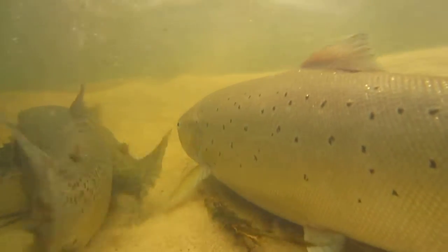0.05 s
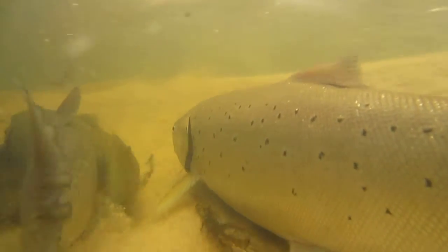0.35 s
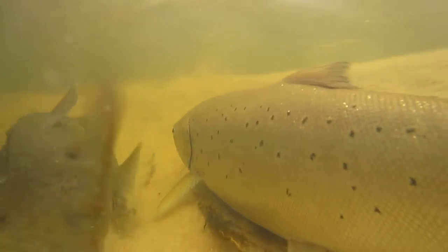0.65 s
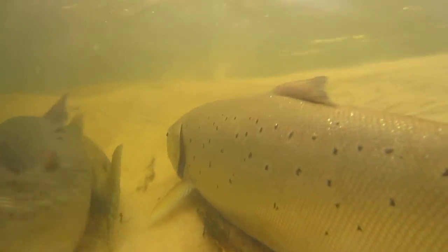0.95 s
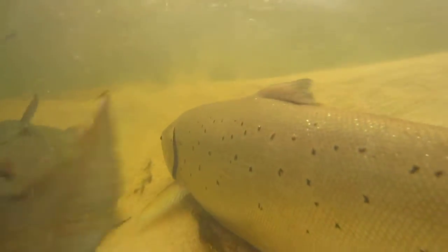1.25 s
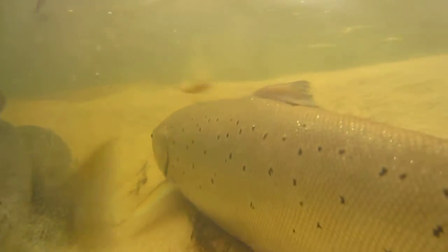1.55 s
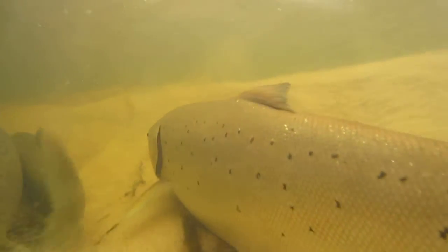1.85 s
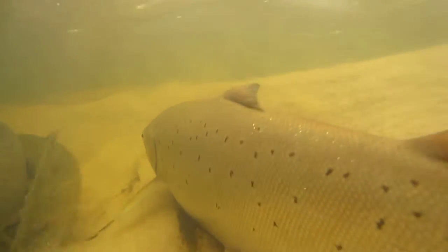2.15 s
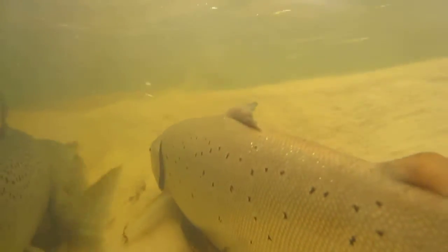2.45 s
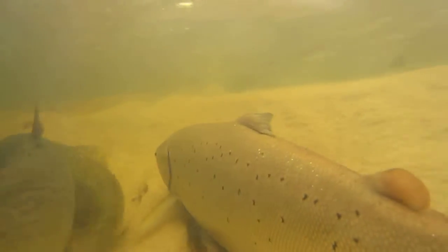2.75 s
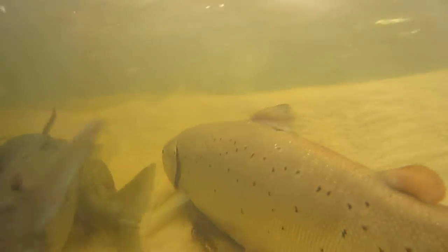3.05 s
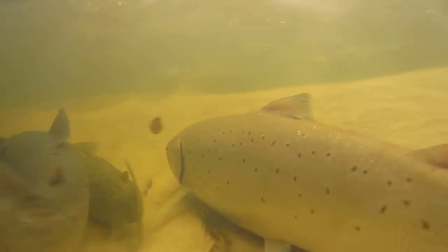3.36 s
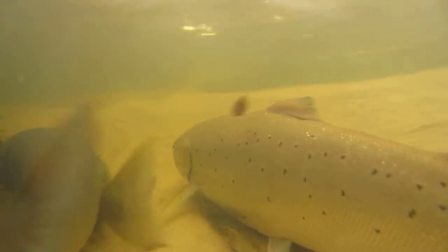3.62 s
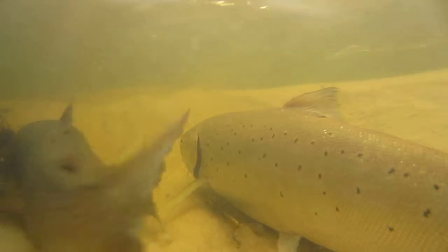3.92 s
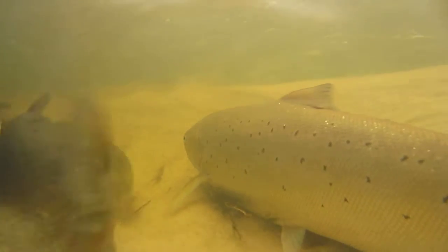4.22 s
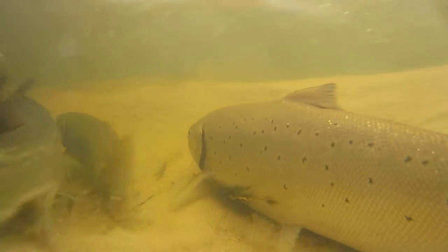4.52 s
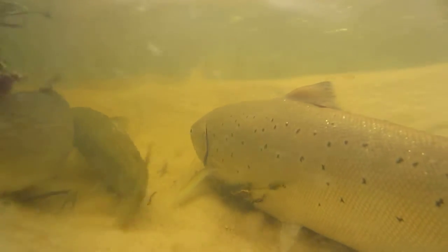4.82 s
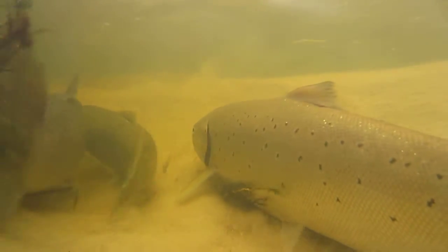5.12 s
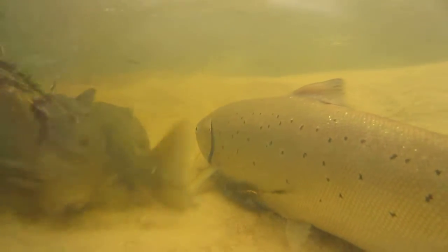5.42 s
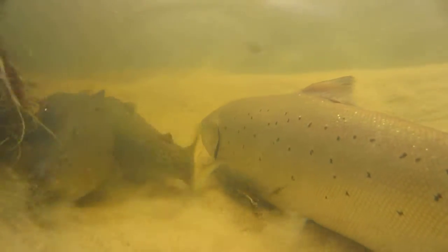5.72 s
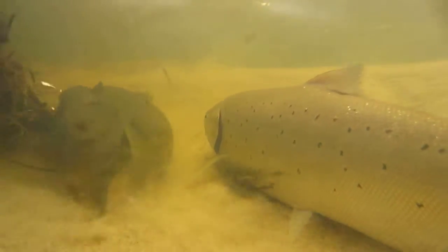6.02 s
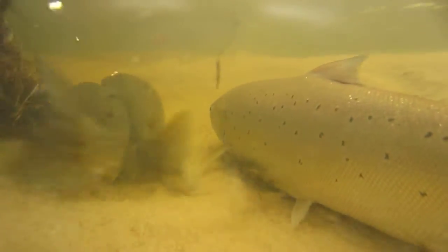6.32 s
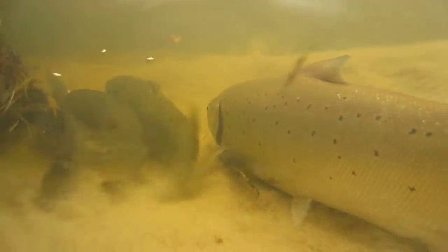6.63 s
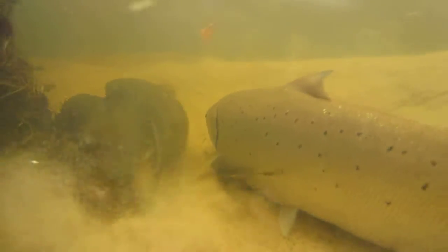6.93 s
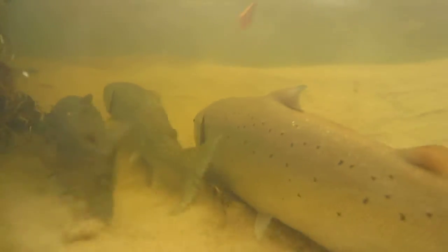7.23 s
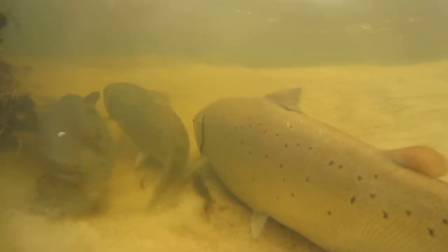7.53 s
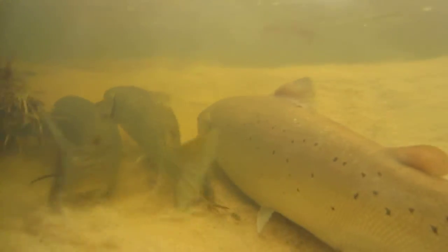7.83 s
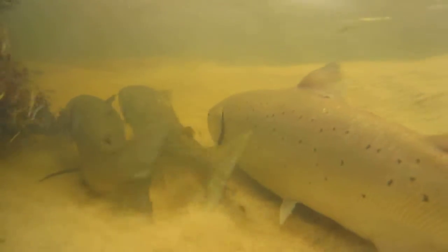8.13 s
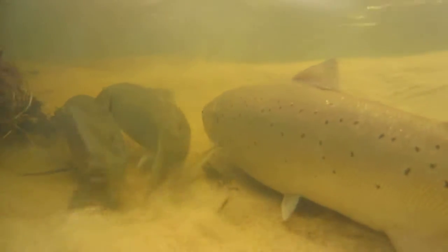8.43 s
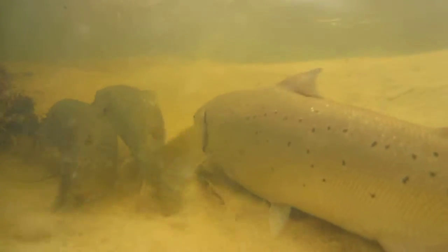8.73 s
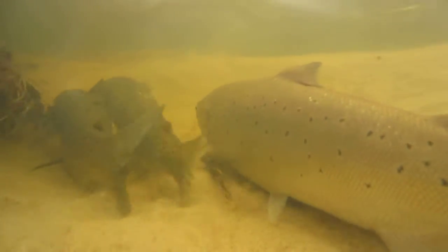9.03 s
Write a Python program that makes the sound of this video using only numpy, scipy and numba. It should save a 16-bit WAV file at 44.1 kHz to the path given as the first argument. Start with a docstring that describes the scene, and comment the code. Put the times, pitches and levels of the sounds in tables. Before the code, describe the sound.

Underwater, a low current swells into booming, rushing surges while pebbles click, sand patters and one hard slap of water lands.

```python
"""On a sandy river bed, close behind large fish beating their tails; a camera in a watertight case,
two microphone ports. At first the river rumbles, sand patters on the shell and gravel scrapes.
From 2 s surges buffet the case, which booms near 190 Hz, gurgles and rushes up to 3 kHz.
Near 3 s pebbles clack and a few bubbles plink. After 7 s the surges ease and the pebbles knock again;
at 8.8 s the hardest push of water slaps the case."""
import sys
import numpy as np
from scipy import signal
from scipy.fft import rfft, irfft
from scipy.io import wavfile
from scipy.ndimage import uniform_filter1d, map_coordinates
from numba import njit

SR = 44100
rng = np.random.default_rng(int(sys.argv[2]) if len(sys.argv) > 2 else 0)


def master(y):
    """Save y as 16-bit WAV."""
    cut = np.clip(np.atleast_2d(y).T, -1, 1)
    pcm = np.round(cut * 32767)  # scale
    wavfile.write(sys.argv[1], SR, pcm.astype(np.int16))


N = 404397
TIME = np.arange(N) / SR

# surges of water against the case: start t/s, hold/s, boom level/dB, rush level/dB
SURGES = [(1.145, 0.046, -32, -58), (2.08, 0.069, -15, -35.5), (2.28, 0.26, -23.5, -38.5),
          (2.4, 0.22, -22, -52), (2.65, 0.13, -18, -41), (2.99, 0.081, -17, -37.5),
          (3.11, 0.14, -19.5, -41.5), (3.21, 0.36, -16.5, -38.5), (3.58, 0.24, -12.5, -33.5),
          (3.83, 0.28, -16.5, -36), (4.095, .11, -13, -35.5), (4.29, 0.192, -21, -43),
          (4.66, 0.063, -20, -44), (4.79, 0.04, -23, -53), (4.98, 0.38, -24.5, -51),
          (5.335, 0.13, -16.5, -39.5), (5.475, 0.13, -12, -35), (5.63, 0.19, -16.5, -39),
          (5.78, 0.3, -14.5, -37), (6.16, 0.076, -19.5, -46), (6.255, 0.11, -14.5, -39),
          (6.4, 0.22, -20.5, -43.5), (6.52, 0.29, -15, -36), (6.79, 0.19, -23.5, -35.5),
          (6.97, 0.347, -37, -39), (7.32, 0.1, -18.5, -40), (8.04, 0.25, -25, -48),
          (8.805, 0.079, -15.5, -26.5), (8.93, 0.087, -19, -35.5), (9.04, 0.041, -16.5, -35)]
# the steady current between surges: t/s, murmur level/dB, rush level/dB
CURRENT = [(0, -35, -51.5), (1.8, -36, -51.5), (2.6, -22, -41), (4.6, -30.5, -50.5), (7.6, -29.5, -46),
           (8.7, -31.5, -48), (9.17, -35.5, -41.5)]
# low resonances of the case: f/Hz, level/dB
BOOM_SPECTRUM = [(40, -38.5), (90, -24), (115, -7.5), (155, -5), (186, 1.5), (215, -3.5), (262, -10.5),
                 (300, -22), (335, -14.5), (368, -12), (425, -16.5), (490, -27), (600, -35), (1000, -72.5),
                 (9000, -120)]
# the boom sits higher or lower with the eddy that drives it: t/s, peak f/Hz
BOOM_PITCH = [(2.7, 195.9), (3.7, 188.9), (4.5, 171.3), (5.5, 173.8), (6.65, 191.5), (7.4, 183.9)]
# turbulence on the shell: f/Hz, level/dB
RUSH_SPECTRUM = [(250, -9.5), (520, -1), (735, 3.5), (900, -1.5), (1250, -9), (1420, -7.5), (1950, -5),
                 (2550, -3.5), (2980, -5), (3250, -20), (5800, -36.5), (6650, -20), (7500, -68)]
# a wandering dip, at times a peak, in the rush: t/s, centre f/Hz, gain/dB
HOLLOW = [(2.1, 1370, -4.5), (3.2, 1460, 1.5), (4, 2230, -6), (6.8, 2130, -3), (8.5, 2020, 7.5),
          (8.8, 2080, -12)]
# sudden slaps of water on the case: t/s, length/s, level/dB
SLAPS = [(2.083, 0.084, -19), (4.108, 0.044, -21), (4.165, 0.022, -22.5), (8.828, 0.085, -13.5)]
# the case struck by water: f/Hz, level/dB
SLAP_SPECTRUM = [(50, -14), (120, -22), (180, 10.5), (290, -8.5), (380, 3), (540, -7.5), (640, -8.5),
                 (850, -22.5), (1350, -18), (2000, -23.5), (2900, -17.5), (3600, -62), (12000, -99)]
# hard pushes of water: t/s, level/dB
THUMPS = [(4.165, -14), (8.849, -4.5)]
# churning in the wake of a tail: t/s, length/s, level/dB, f/Hz
GURGLES = [(2.354, 0.51, -30.5, 400), (3.643, 0.48, -24, 365), (3.66, 0.57, -45, 740),
           (4.072, 0.21, -26.5, 694), (4.657, 0.12, -31, 610), (5.82, 0.35, -26.5, 700),
           (6.554, 0.47, -28, 397), (8.832, 0.14, -25, 640), (8.93, 0.23, -33, 656.8)]
# churned water: f/Hz, level/dB
GURGLE_SPECTRUM = [(250, -28), (410, 11.5), (545, 0.5), (625, -2.5), (735, 2.5), (880, -11), (1100, -8.5),
                   (1600, -41), (9000, -95)]
# pebbles knocking together: t/s, level/dB, f/Hz, bounce delay/s, case ring re knock/dB
CLACKS = [(1.052, -24, 2240, 0.011, -28), (2.717, -13.5, 2080, .006, -15), (2.911, -15.5, 2260, .009, -20),
          (3.189, -21, 2100, 0.014, -24), (7.356, -14.5, 2440, .011, -23), (7.701, -26, 2060, 0.014, -26),
          (7.7946, -18.5, 2380, .004, -16), (7.9136, -19.5, 2390, 0.0069, -26),
          (8.0157, -12.5, 2450, 0.005, -25), (8.0975, -14.5, 2030, .0027, -11.5),
          (8.289, -21.5, 2340, .0037, -24), (8.4183, -15.5, 2400, 0.0092, -23),
          (8.601, -19.5, 2320, .0089, -26)]
# the case rings after each knock: f/Hz, level/dB, t60/s
SHELL_MODES = [(480, 2.5, 0.03), (1550, 2, 0.033), (2550, -13, 0.023), (3470, -2.5, 0.04)]
# coarse grains hitting the shell: t/s, level/dB, left minus right/dB
TICKS = [(0.591, -25, -13), (2.418, -23, -4), (2.531, -26, -4), (2.6015, -23, -10), (3.3067, -26, -2),
         (3.593, -19.5, 10), (3.8067, -13, -5), (3.9373, -23, -9), (4.0103, -17.5, -10), (4.0444, -16.5, 3),
         (4.1214, -24, 12), (4.6077, -21.5, -4), (5.167, -21.5, -7), (5.4245, -23, -2), (5.4588, -23, 2),
         (5.702, -22, 6), (6.5587, -15, -13), (6.957, -22, -5), (7.078, -20, 15), (7.1981, -12.5, -4),
         (7.4653, -12.5, -4), (7.9055, -15, -1), (7.948, -19, 3), (8.0868, -22.5, -9), (8.1302, -15, -3),
         (8.3336, -23, -2), (8.7259, -24, -5), (9.1423, -19.5, 12)]
# sand always adrift: t/s, level/dB
SAND_LEVEL = [(0, -51), (.9, -56.5), (2.1, -59.5), (2.5, -55), (4.8, -52), (6.9, -50), (9.17, -48.5)]
# clouds of stirred-up sand: start t/s, hold/s, level/dB
FLURRIES = [(.52, 0.13, -49), (2.93, 0.62, -50), (3.89, 0.27, -52), (4.38, 0.27, -53.5), (5.0, 0.22, -48.5),
            (5.33, 0.16, -46.5), (5.92, 0.29, -51.5), (7.14, 0.13, -44), (7.67, 0.46, -50.5),
            (8.05, 0.3, -46), (8.77, 0.11, -51)]
# sand on the shell: f/Hz, level/dB
SAND_SPECTRUM = [(500, -21.5), (1500, 1.5), (3000, 2.5), (4700, 4.5), (6500, 1.5), (8500, -1),
                 (10500, -7.5), (12000, -23), (13300, -8.5), (15700, -7)]
# gravel shifting on the bed: t/s, length/s, level/dB
SCRAPES = [(.85, 0.069, -43), (1.049, .033, -38.5), (1.383, 0.059, -38), (1.446, .1, -38),
           (1.557, 0.053, -35), (1.67, 0.051, -39), (1.75, 0.046, -38.5), (1.853, 0.022, -40.5)]
# grinding gravel: f/Hz, level/dB
GRAVEL_SPECTRUM = [(200, 0), (560, 5), (780, 2), (950, -9), (1120, 3), (1330, -15.5), (1800, -10),
                   (2270, -1), (2600, -6), (2900, -20), (4200, -31), (12000, -72)]
# bubbles: t/s, level/dB, f/Hz, t60/s
BUBBLES = [(2.717, -30, 2100, .05), (2.918, -22, 2030, 0.047), (3.187, -25, 2034, 0.055),
           (4.1175, -21, 2050, 0.032), (4.392, -27, 2090, 0.028), (6.988, -23.5, 3140, 0.033),
           (6.997, -25, 590, 0.2), (7.799, -19, 3020, 0.028), (8.098, -14.5, 2040, 0.029)]
# the calm current, heard from inside the case: f/Hz, level/dB
MURMUR_SPECTRUM = [(60, -18), (120, -7.5), (185, 0.5), (240, -6.5), (310, -15.5), (370, -11.5), (480, -24),
                   (545, -23.5), (650, -31.5), (780, -25.5), (950, -35), (1180, -31), (1480, -33.5),
                   (1850, -40), (2700, -29.5), (3400, -42), (9000, -88.5)]
# swell of the river's rumble: t/s, level/dB
RUMBLE_LEVEL = [(0, -38), (1.3, -37), (2.1, -33.5), (3.9, -31.5), (4.75, -32.5), (5.6, -30), (6.7, -27.5),
                (7.5, -31), (9.17, -32)]
# the river's deep rumble: f/Hz, level/dB
RUMBLE_SPECTRUM = [(12, -2), (30, 1.5), (47, -1.5), (61, 6.5), (85, 4), (115, 7.5), (150, -2.5), (300, -41),
                   (9000, -110)]
# course of the thin hiss: t/s, level/dB
HISS_LEVEL = [(2.02, -65), (2.11, -50.5), (2.24, -57.5), (5, -60.5), (7.75, -52.5), (9.17, -63)]
# narrow bands of the hiss: f/Hz, level/dB
HISS_SPECTRUM = [(3800, -30), (4950, -1), (5800, -19), (6450, 4.5), (6800, 2), (7350, -21), (9000, -50)]
# faint whine of the camera: f/Hz, level/dB
WHINE = [(1394, -64)]
# how differently the two walls of the case flex: f/Hz, side minus mid/dB
WALL_FLEX = [(200, -33), (380, -17.5), (650, -4.5), (1300, 0), (1900, 1.5), (2700, -9.5), (4000, -8)]
# balance of the microphone ports: f/Hz, left minus right/dB
PORT_BALANCE = [(110, -1.5), (200, -2), (380, -.5), (700, 3.5), (1290, -2.5), (2380, 1.7), (4400, -2)]

SURGE_ATTACK_S, BOOM_FALL_DB_PER_S, RUSH_FALL_DB_PER_S = 0.014, 189.5, 192
EDDIES_PER_S, BOOM_EDDY_DB, RUSH_EDDY_DB = 28, -0.35, 1.55
FLURRY_ATTACK_S, FLURRY_FALL_DB_PER_S = 0.025, 129
ATTACK_PER_HOLD = 0.068  # a longer surge or flurry swells more slowly: s of attack per s held


def boom(steadiness=0.82, smooth_s=0.07, gain_db=-1.5, wander=0.028):
    """Eddies ring the case around the microphone at a wavering pitch; each surge pushes fairly evenly."""
    peak_hz = max(BOOM_SPECTRUM, key=lambda point: point[1])[0]
    speed = np.interp(TIME, *np.transpose(BOOM_PITCH)) / peak_hz * (1 + wander * walk(rate=16))
    resonance = colour(rng.standard_normal(N), BOOM_SPECTRUM)
    ring = unit(map_coordinates(resonance, [np.cumsum(speed)], mode="mirror"))  # speed bends the pitch
    power = uniform_filter1d(ring ** 2, int(smooth_s * SR)) + 1e-9
    even_ring = unit(ring / power ** (steadiness / 2))
    push = gusts(SURGES, SURGE_ATTACK_S, BOOM_FALL_DB_PER_S, column=2)
    return even_ring * push * undb(gain_db + BOOM_EDDY_DB * walk(EDDIES_PER_S))


def rush(gain_db=-0.28):
    """Fine turbulence scours the shell in countless small pushes."""
    scour = unit(colour(grains(rate=5000, spread_db=1.5, limit_db=18), RUSH_SPECTRUM))
    surges = gusts(SURGES, SURGE_ATTACK_S, RUSH_FALL_DB_PER_S, column=3)
    push = np.hypot(drift(CURRENT, column=2), surges)
    return scour * push * undb(gain_db + RUSH_EDDY_DB * walk(EDDIES_PER_S))


def hollow(x, width_hz=600.0):
    """A dip, at times a peak, wanders through the rush and changes its vowel from surge to surge."""
    times, centres_hz, _ = np.transpose(HOLLOW)
    vowel = band(x, np.interp(TIME, times, centres_hz), width_hz)
    return x - (1 - drift(HOLLOW, column=2)) * vowel


def slaps():
    """A whirl of water breaks on the case, brighter than the steady boom."""
    return noise(SLAP_SPECTRUM) * swells(SLAPS, rise=0.59)


def thumps():
    """The hardest push of a surge knocks once on the case."""
    blows = np.zeros(N)
    for s, db in THUMPS:
        blows[int(s * SR)] = undb(db)
    return strike(blows, SLAP_SPECTRUM)


def gurgles(width_hz=80.0, body_db=-11):
    """Water churned by a tail close ahead gulps irregularly, each eddy around its own wandering pitch."""
    gulps = unit(colour(grains(rate=880, spread_db=1.5, limit_db=15), GURGLE_SPECTRUM))
    wander = 1 + 0.044 * walk(rate=14)
    out = np.zeros(N)
    for s, length, db, hz in GURGLES:
        eddy = undb(body_db) * gulps + band(gulps, hz * wander, width_hz)
        out += eddy * swells([(s, length, db)], rise=0.56)
    return out * undb(2 * walk(rate=37))


def clacks(contact_s=0.0006, bounce_db=-6, grit_db=-13, grit_t60_s=0.059, gain_db=-2, pan_db=4):
    """Water damps each knock quickly; the pebble bounces once and grinds to rest as the case rings."""
    def contact(age, hz):
        return (age / contact_s * np.exp(1 - age / contact_s)) ** 2 * np.sin(2 * np.pi * hz * age)
    knocks, grit = np.zeros(N), np.zeros(N)
    t = np.arange(SR // 10) / SR
    shell = sum(undb(db - 60 * t / t60) * np.sin(2 * np.pi * hz * t) for hz, db, t60 in SHELL_MODES)
    for s, db, hz, bounce_s, shell_db in CLACKS:
        bounce = undb(bounce_db) * contact(np.maximum(t - bounce_s, 0), hz)
        knock = contact(t, hz) + bounce + undb(shell_db) * shell
        add(knocks, s, undb(db + gain_db) * knock)
        add(grit, s, undb(db + grit_db - 60 * t / grit_t60_s))
    return pan(knocks + grit * noise(GRAVEL_SPECTRUM), pan_db)


def ticks(gain_db=2, lag_s=0.00012, skid_db=-21, skid_t60_s=0.0096):
    """Coarse grains snap on the shell and skid briefly; the two ports hear them a little apart."""
    hits = np.zeros((2, N))
    t = np.arange(SR // 100) / SR
    for s, db, pan_db in TICKS:
        for port, sign in zip(hits, (1, -1)):
            skid = undb(skid_db - 60 * t / skid_t60_s) * rng.standard_normal(len(t))
            snap = signal.unit_impulse(len(t)) + skid
            add(port, s + lag_s * rng.random(), undb(db + sign * pan_db / 2) * snap)
    return strike(hits, SAND_SPECTRUM) * undb(gain_db)


def sand(coarse_db=0.53):
    """Silt and larger grains patter on the shell in flurries, each heard at the nearer port only."""
    def port():
        silt = unit(grains(rate=6000, spread_db=4, limit_db=17))
        coarse = unit(grains(rate=130, spread_db=7, limit_db=18))
        return colour(silt + undb(coarse_db) * coarse, SAND_SPECTRUM) * undb(2 * walk(rate=140))
    filter_gain = np.linalg.norm(colour(signal.unit_impulse(N), SAND_SPECTRUM))
    flurries = gusts(FLURRIES, FLURRY_ATTACK_S, FLURRY_FALL_DB_PER_S, column=2)
    amount = np.hypot(drift(SAND_LEVEL, column=1), flurries)
    return np.array([port(), port()]) / filter_gain * amount * undb(0.49 * walk(rate=33))


def scrapes():
    """Gravel slides on the bed in short runs of tiny knocks."""
    knocks = grains(rate=1100, spread_db=3, limit_db=13)
    return unit(colour(knocks, GRAVEL_SPECTRUM)) * swells(SCRAPES, rise=0.7)


def bubbles(glide=0.3, pan_db=1.5, burst_db=-10, burst_t60_s=0.084, wobble_db=4, attack_s=0.0032):
    """Each bubble pinches off with a rough burst, then rings, rising a little in pitch as it fades."""
    ring, burst = np.zeros(N), np.zeros(N)
    t = np.arange(SR // 8) / SR
    for s, db, hz, t60 in BUBBLES:
        envelope = np.minimum(t / attack_s, 1) * undb(db - 60 * t / t60)
        add(ring, s, envelope * np.sin(2 * np.pi * hz * t * (1 + glide * t)))
        add(burst, s, undb(db + burst_db - 60 * t / burst_t60_s))
    ring *= undb(wobble_db * walk(rate=220))
    return pan(ring + burst * noise(GRAVEL_SPECTRUM), pan_db)


def murmur():
    """The steady current hums in the case."""
    return noise(MURMUR_SPECTRUM) * drift(CURRENT, column=1)


def rumble():
    """The slow, deep pressure of the river all around."""
    return noise(RUMBLE_SPECTRUM) * drift(RUMBLE_LEVEL, column=1)


def hiss(waver_db=1):
    """A thin, wavering hiss near 6.5 kHz flares with the first strong surge and then lingers."""
    return noise(HISS_SPECTRUM, (2, N)) * drift(HISS_LEVEL, column=1) * undb(waver_db * walk(rate=15))


def whine():
    """A thin steady tone from the camera's electronics, right beside the microphone."""
    return sum(undb(db) * np.sqrt(2) * np.sin(2 * np.pi * hz * TIME) for hz, db in WHINE)


def walls(source):
    """Two microphone ports: the case moves as one in the bass, its walls flex apart higher up."""
    mid, side = source(), colour(source(), WALL_FLEX)
    return np.array([colour(mid + sign * side, [(hz, sign * db / 2) for hz, db in PORT_BALANCE])
                     for sign in (1, -1)])


def undb(db):
    """Decibels to gain."""
    return 10 ** (np.asarray(db) / 20)


def unit(x):
    """Scale to rms 1."""
    return x / np.sqrt(np.mean(x ** 2))


def add(track, s, sound):
    """Mix a sound into a track at s seconds."""
    i = int(s * SR)
    track[i:i + len(sound)] += sound[:N - i]


def pan(x, db):
    """Stereo with the left port db above the right."""
    return x * undb(np.array([[db], [-db]]) / 2)


def colour(x, points, size=2 ** 15):
    """Causal filter through (Hz, dB) points, built from the cepstrum."""
    hz, db = np.transpose(points)
    bins_hz = np.arange(size // 2 + 1) * SR / size
    log_gain = np.log(undb(np.interp(np.log(bins_hz + 1), np.log(hz), db)))
    cepstrum = irfft(log_gain)[:size // 2]
    cepstrum[1:] *= 2
    response = irfft(np.exp(rfft(cepstrum, size)))[:size // 2]
    return signal.oaconvolve(x, np.array(response, ndmin=x.ndim), axes=-1)[..., :N]


def noise(spectrum, shape=N):
    """Coloured noise of rms 1."""
    return unit(colour(rng.standard_normal(shape), spectrum))


def strike(blows, spectrum):
    """Colour impacts so that a blow of size 1 peaks at 1."""
    return colour(blows, spectrum) / np.abs(colour(signal.unit_impulse(N), spectrum)).max()


@njit
def band(x, hz, width_hz):
    """State-variable band-pass with a moving centre, gain 1 there."""
    y, band_state, low_state = np.empty(len(x)), 0., 0.
    for i in range(len(x)):
        g, damping = np.tan(np.pi * hz[i] / SR), width_hz / hz[i]
        passed = (band_state + g * (x[i] - low_state)) / (1 + g * (g + damping))
        band_state = 2 * passed - band_state
        low_state += 2 * g * passed
        y[i] = damping * passed
    return y


def walk(rate):
    """Random levels held 1 / rate s and smoothed twice; rms 1."""
    hold = max(int(SR / rate), 2)
    steps = np.repeat(rng.standard_normal(N // hold + 1), hold)
    return unit(uniform_filter1d(uniform_filter1d(steps, hold), hold)[:N])


def grains(rate, spread_db, limit_db):
    """Random impacts, rate a second: many small ones and a few large."""
    size_db = np.minimum(spread_db * rng.exponential(size=N), limit_db)
    return (rng.random(N) < rate / SR) * rng.choice([-1, 1], N) * undb(size_db)


def swells(table, rise):
    """An arch of level for each (s, length, dB) row; a small rise makes it peak early."""
    gain = np.zeros(N)
    for s, length, db in table:
        inside = (TIME > s) & (TIME < s + length)
        gain[inside] += undb(db) * np.sin(np.pi * ((TIME[inside] - s) / length) ** rise)
    return gain


def drift(table, column):
    """Gain that follows one dB column of a table, joined by straight lines in time."""
    rows = np.array(table)
    return undb(np.interp(TIME, rows[:, 0], rows[:, column]))


def gusts(table, attack_s, fall_db_per_s, column):
    """Gain of (start, hold, dB..) rows that each rise, hold and die away; they add in power."""
    power = np.zeros(N)
    age = TIME[:SR * 3 // 2]
    for row in table:
        start_s, hold_s = row[:2]
        onset = np.minimum(age / (attack_s + ATTACK_PER_HOLD * hold_s), 1)
        level_db = row[column] - fall_db_per_s * np.maximum(age - hold_s, 0)
        add(power, start_s, (onset * undb(level_db)) ** 2)
    return np.sqrt(power)


def scene():
    """Water and gravel reach the microphone through the whole case; sand strikes the shell directly."""
    def water():
        return rumble() + murmur() + boom() + hollow(rush() + slaps() + thumps()) + gurgles() + scrapes()
    return walls(water) + clacks() + bubbles() + sand() + ticks() + hiss() + whine()


def record(dry):
    """The camera cuts the top of the treble."""
    top_hz = 15950
    return signal.sosfilt(signal.ellip(10, 0.2, 80, top_hz, fs=SR, output="sos"), dry)


dry = scene()
out = record(dry)
master(out)
```